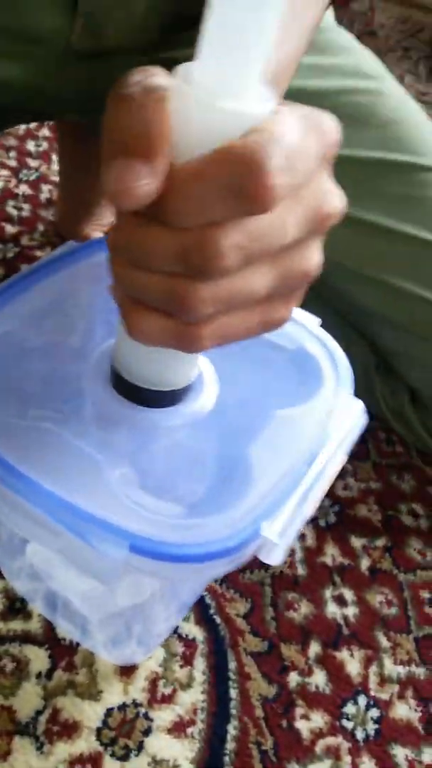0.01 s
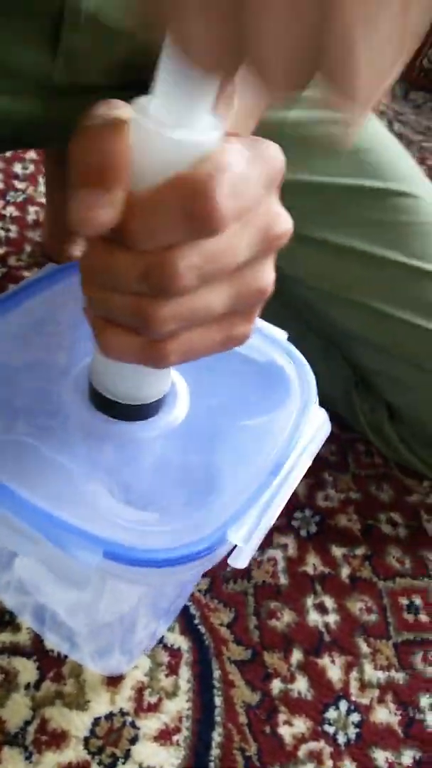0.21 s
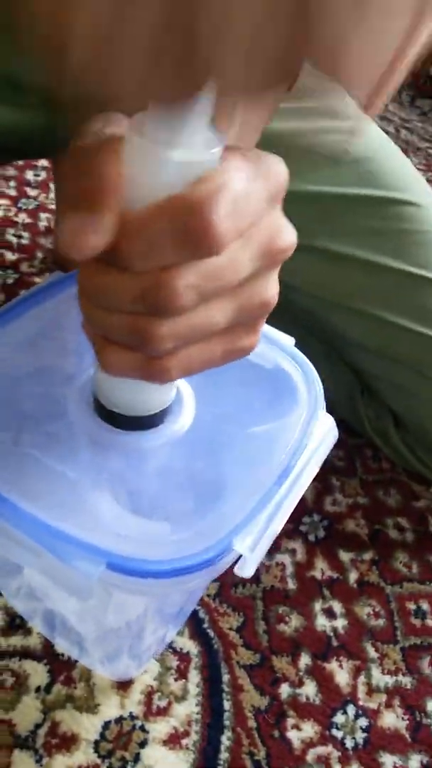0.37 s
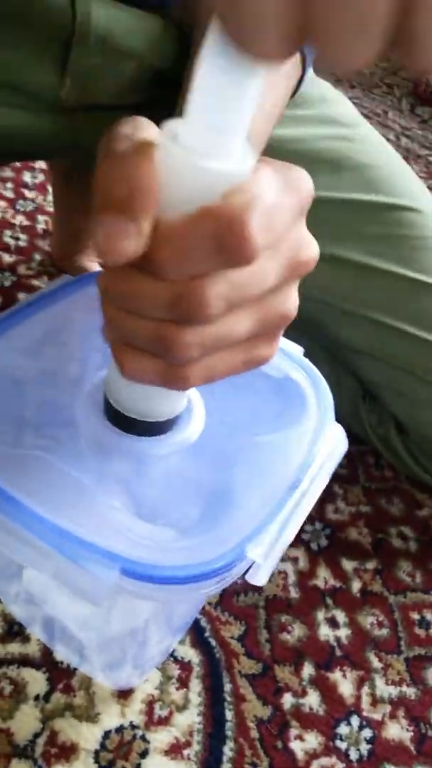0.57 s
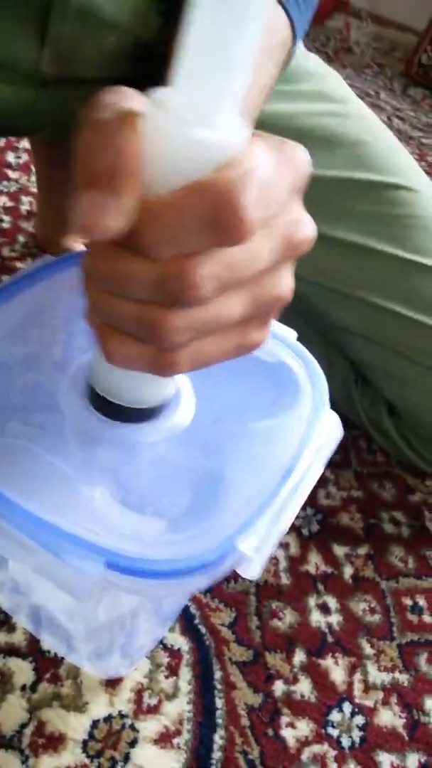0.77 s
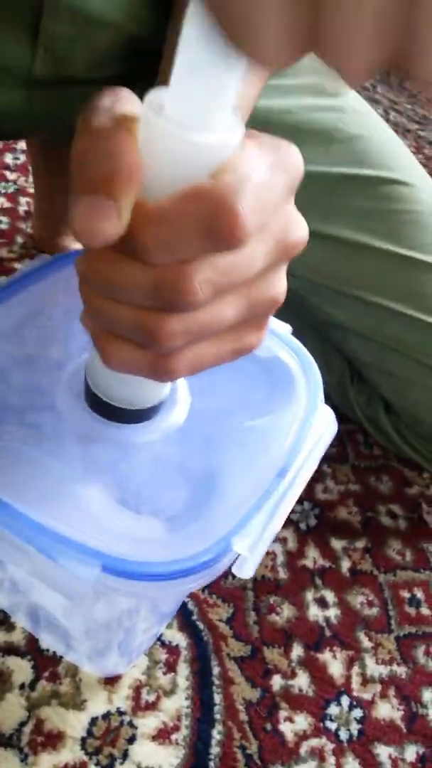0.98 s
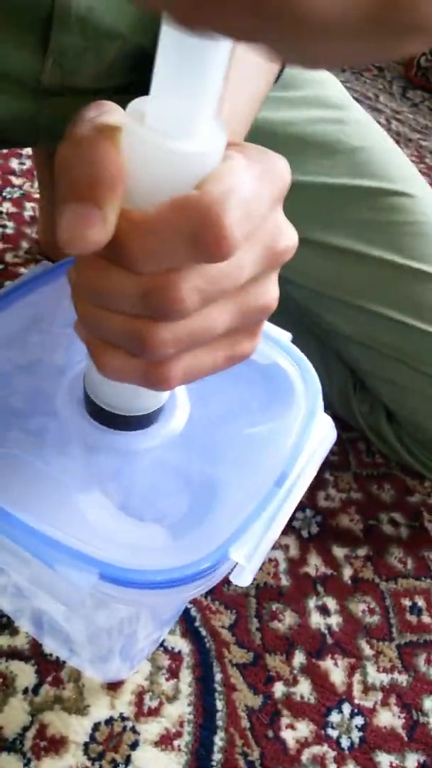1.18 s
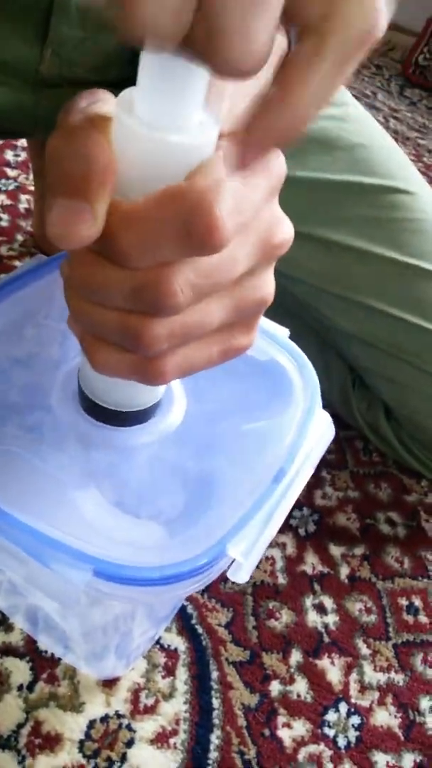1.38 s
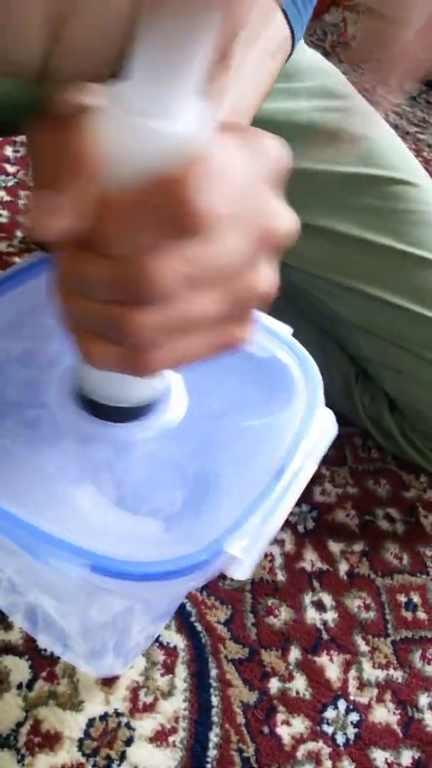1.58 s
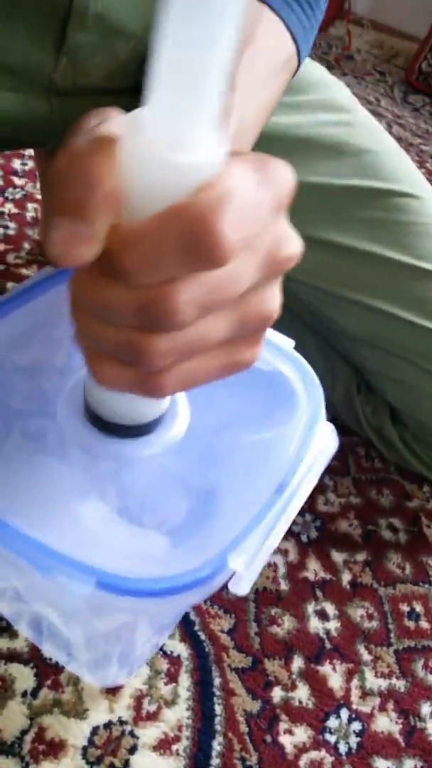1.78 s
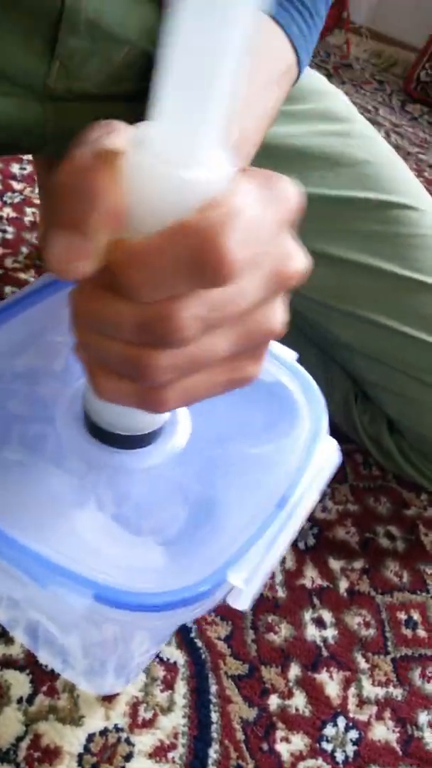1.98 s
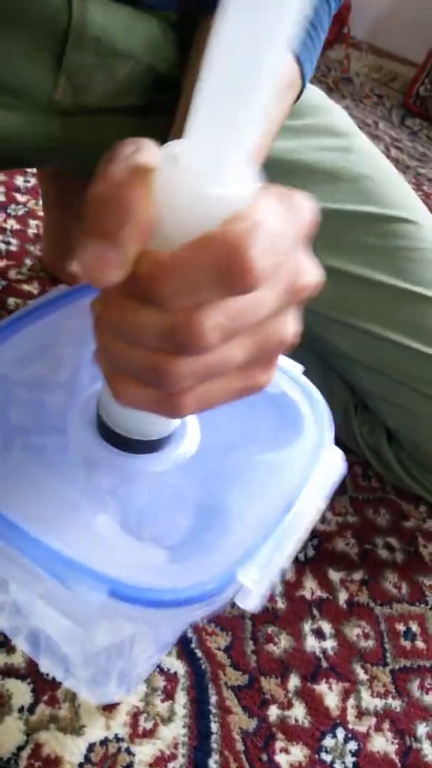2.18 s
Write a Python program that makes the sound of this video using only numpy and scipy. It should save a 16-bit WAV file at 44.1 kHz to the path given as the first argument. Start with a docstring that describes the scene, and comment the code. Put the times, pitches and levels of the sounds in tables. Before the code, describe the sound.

Close up in a small dry room, a plastic piston pump puffs and rubs in fast strokes on a hollow lid, with two loud clacks, small knocks, a short near-silent pause, then three more pushes.

```python
"""A hand vacuum pump is worked quickly on the lid of a plastic food container, in a small room.
It opens on the end of a pull, then four pushes hiss out with a softer, often whistling pull after each.
The first push slams into its end stop; after a short rest with only small knocks the pump starts again,
slams once more and runs through three pushes to a last pull. The air is noise through sliding barrel
resonances; the seal's rub is uneven noise, and the knocks on the hollow lid are damped modes."""
import sys
import numpy as np
from scipy import signal
from scipy.fft import rfft, irfft, next_fast_len
from scipy.io import wavfile
from scipy.ndimage import uniform_filter1d, map_coordinates

SR = 44100
rng = np.random.default_rng(int(sys.argv[2]) if len(sys.argv) > 2 else 0)


def dump(signal):
    """Clip the signal to [-1, 1] and save it as 16-bit WAV at the path in sys.argv[1]."""
    limited = np.clip(np.atleast_2d(signal).T, -1, 1)
    pcm = np.round(limited * 32767).astype(np.int16)
    wavfile.write(sys.argv[1], SR, pcm)


N = 97020  # 2.2 s


def amp(db):
    """Decibels to a linear gain."""
    return 10 ** (np.asarray(db) / 20)


def unit(x):
    """x brought to an rms of 1."""
    return x / np.sqrt(np.mean(x ** 2) + 1e-20)


def along(points, hz):
    """Read (Hz, value) points on a log frequency axis."""
    f, v = np.transpose(points)
    return np.interp(np.log(hz + 1), np.log(f + 1), v)


def clock():
    """The time of every sample in seconds."""
    return np.arange(N) / SR


def wobble(rate):
    """A smooth random curve, rate knots a second."""
    return map_coordinates(rng.standard_normal(N // 20), [clock() * rate], mode="mirror")


def filtered(x, response):
    """x shaped by a gain that is a function of frequency."""
    m = next_fast_len(N + SR // 2)
    return irfft(rfft(x, m) * response(np.fft.rfftfreq(m, 1 / SR)), m)[:N]


def noise(colour):
    """Coloured noise of rms 1."""
    return unit(filtered(rng.standard_normal(N), lambda hz: amp(along(colour, hz))))


def bump(middle, length):
    """A smooth swell, length seconds wide at half height."""
    return np.cos(np.pi / 2 * np.clip((clock() - middle) / length, -1, 1)) ** 2


def reedy(hz, width_hz):
    """A sine of rms 1 whose pitch shakes quickly, so that it sounds breathy."""
    shaking_hz = hz + width_hz * wobble(4 * width_hz)
    return np.sqrt(2) * np.sin(2 * np.pi * np.cumsum(shaking_hz) / SR)


# Resonances of the air in the barrel. Each row: ratio to the lowest resonance, lift in dB, width in Hz.
BARREL_MODES = [(1, 9.5, 170), (1.66, 9, 230), (2.25, 5, 260)]
BARREL_LOW_HZ, BARREL_PUSH_HZ = 2330, 3700  # lowest resonance: piston down; start of a push
PATCHY_DB = 2


def through_barrel(air, pitch_hz):
    """Air noise lifted at the barrel's sliding resonances, in turbulent patches."""
    hz, t, spectrum = signal.stft(air, SR, nperseg=512)
    pitch = np.interp(t, clock(), pitch_hz)
    lift_db = 0
    for ratio, db, width_hz in BARREL_MODES:
        offset = (hz[:, None] - ratio * pitch) / width_hz
        lift_db = lift_db + db / (1 + offset ** 2)
    # random gains smoothed over neighbouring frequencies, then over time
    patches = uniform_filter1d(rng.standard_normal(spectrum.shape), size=3, axis=0)
    patches = unit(uniform_filter1d(patches, size=5, axis=1))
    lifted = spectrum * amp(lift_db + PATCHY_DB * patches)
    return unit(signal.istft(lifted, SR, nperseg=512)[1][:N])


# Spectrum of the rubbing, with the lid's two resonances. Each row: frequency in Hz, level in dB per Hz.
RUB_SPECTRUM = [(40, -41.5), (120, -23.5), (200, -5), (300, -11), (380, -9), (460, 6), (580, -21.5),
                (700, -11), (900, -9.5), (1050, 0), (1220, -9), (1450, -28.5), (3000, -30.5), (8000, -43.5)]


def friction():
    """Uneven rubbing noise of rms 1 in the lid's two resonances."""
    return unit(noise(RUB_SPECTRUM) * amp(3.4 * wobble(130)))


# Push strokes. Each row: start, fastest moment and end in seconds, level in dB, treble lift in dB.
PUSH_STROKES = [(0.132, 0.203, 0.26, -28.5, -1), (0.392, .478, .512, -34.5, 2),
                (0.638, .716, .76, -34.5, 1.5), (0.859, .938, .995, -37.5, 1.5),
                (1.58, 1.669, 1.72, -27, 1), (1.807, 1.895, 1.975, -29, 1.5), (1.998, 2.1, 2.185, -32, 1.5)]
# Spectrum of the air pushed out. Each row: frequency in Hz, level in dB per Hz.
PUSH_AIR_SPECTRUM = [(200, -16.5), (1200, -2), (1900, -4.5), (2500, 0.5), (3500, -1), (4900, -4.5),
                     (5400, 5), (5900, -4), (6700, 2), (7600, -5.5), (10500, -4), (14500, -11.5)]
SWELL_DEPTH_DB, SWELL_SHAPE = 36, 1.4  # climb from stroke start to peak; curve of the rounded peak
TREBLE_HZ = 6600
PUSH_FLUTTER_DB = 1.1
PUSH_RUB_DB = -8.5  # piston friction against the air


def pushes():
    """Hiss and friction swell with the piston's speed while the resonances fall."""
    t = clock()
    flow, treble_flow, pitch = np.zeros(N), np.zeros(N), np.zeros(N)
    for start, fastest, end, db, treble_db in PUSH_STROKES:
        # 0 at the fastest moment, 1 at the start and at the end
        off_peak = np.maximum((fastest - t) / (fastest - start), (t - fastest) / (end - fastest))
        swell = amp(db - SWELL_DEPTH_DB * off_peak ** SWELL_SHAPE)
        flow = flow + swell
        treble_flow = treble_flow + swell * amp(treble_db)
        travel_left = np.interp(t, [start, end], [1, 0])
        stroke_pitch = BARREL_LOW_HZ + (BARREL_PUSH_HZ - BARREL_LOW_HZ) * travel_left ** 2
        pitch = np.where(t >= start, stroke_pitch, pitch)
    air = through_barrel(noise(PUSH_AIR_SPECTRUM), pitch)
    treble = filtered(air, lambda hz: hz ** 6 / (hz ** 6 + TREBLE_HZ ** 6))
    hiss = flow * (air - treble) + treble_flow * treble
    return hiss * amp(PUSH_FLUTTER_DB * wobble(220)) + amp(PUSH_RUB_DB) * flow * friction()


# Pull strokes. Each row: start and end in seconds, first and last level in dB,
# lowest barrel resonance at the end in Hz, whistle level in dB.
PULL_STROKES = [(-.02, 0.136, -41, -51.5, 4470, -51), (0.247, 0.397, -38.5, -51.5, 4250, -46.5),
                (0.51, 0.643, -41, -49.5, 3880, -51), (0.755, 0.88, -35, -59, 4070, -48.5),
                (0.982, 1.09, -41, -62.5, 3200, -84.5), (1.408, 1.473, -54, -63.5, 2930, -65),
                (1.479, 1.59, -40.5, -49, 3995, -86), (1.71, 1.81, -40, -44.5, 3200, -49),
                (1.941, 2.017, -43.5, -37, 3160, -48), (2.138, 2.222, -45.5, -38, 3060, -43.5)]
# Spectrum of the air drawn by a pull. Each row: frequency in Hz, level in dB per Hz.
PULL_AIR_SPECTRUM = [(200, -19.5), (1400, -4), (2000, 0.5), (2800, -0.5), (4200, 0.5), (4850, -4),
                     (5400, 1.5), (5950, -3), (6600, -0.5), (7800, -6), (11000, -6.5), (14500, -11)]
PULL_ATTACK_S, PULL_RELEASE_S = 0.032, 0.014
WHISTLE_S, WHISTLE_LEAD_S = 0.04, 0.026  # width; middle ahead of the stroke's end
WHISTLE_RATIO, WHISTLE_RISE_HZ_PER_S, WHISTLE_WIDTH_HZ = 1, 5000, 150
PULL_RUB_DB = -3  # piston friction against the air


def pulls():
    """A softer hiss with rising resonances that ends in a thin whistle, faint on some strokes."""
    t = clock()
    flow, pitch, whistle = np.zeros(N), np.zeros(N), np.zeros(N)
    for start, end, first_db, last_db, top_hz, whistle_db in PULL_STROKES:
        fade_in = np.clip((t - start) / PULL_ATTACK_S, 0, 1)
        fade_out = np.clip((end - t) / PULL_RELEASE_S, 0, 1)
        flow = flow + fade_in * fade_out * amp(np.interp(t, [start, end], [first_db, last_db]))
        stroke_pitch = np.interp(t, [start, end], [BARREL_LOW_HZ, top_hz])
        pitch = np.where(t >= start, stroke_pitch, pitch)
        middle = end - WHISTLE_LEAD_S
        glide_hz = WHISTLE_RATIO * top_hz + WHISTLE_RISE_HZ_PER_S * (t - middle)
        tone = reedy(glide_hz, WHISTLE_WIDTH_HZ)
        whistle = whistle + amp(whistle_db) * bump(middle, WHISTLE_S) * tone
    air = flow * through_barrel(noise(PULL_AIR_SPECTRUM), pitch) + whistle
    flutter = amp(0.4 * wobble(120))
    return air * flutter + amp(PULL_RUB_DB) * flow * friction()


# Puffs as the plunger turns at the top. Each row: middle in seconds, level in dB.
VALVE_SPITS = [(.128, -49.5), (.868, -43.5), (1.596, -37), (1.832, -38), (2.044, -36)]
# Spectrum of the puffs. Each row: frequency in Hz, level in dB per Hz.
SPIT_SPECTRUM = [(300, -21), (1500, -1), (2800, -7.5), (4800, -2.5), (6000, 1.5), (6800, 6.5), (7600, -3),
                 (11500, -4.5), (14500, -4.5)]
SPIT_S = 0.0084


def spits():
    """The valve lets out very short, bright puffs of noise."""
    puffs = sum(amp(db) * bump(s, SPIT_S) for s, db in VALVE_SPITS)
    return noise(SPIT_SPECTRUM) * puffs


def ring(modes, t, ratio):
    """Damped modes that build up briefly after a blow, each a little louder or softer every time."""
    total = 0
    for hz, db, t60, attack in modes:
        decay = amp(db + rng.normal(0, 1.0) - 60 * t / t60)
        build_up = (1 - np.exp(-t / attack)) ** 2
        total = total + decay * build_up * np.sin(2 * np.pi * hz * ratio * t)
    return total


# Contacts of the plunger. Each row: time in seconds, level in dB, then the thump, upper lid ring
# and click in dB against that level, and a pitch ratio for the modes.
CONTACTS = [(0.127, -44.5, 29, -22, 4, 2.3), (.135, -25.5, 10, -10, -17, 0.97),
            (.2167, 4, -1.5, 2, -5, 1.004), (0.39, -27.5, 18, -15.5, -16, 0.78),
            (0.49, -22, -1, -13, -9, 1.06), (0.512, -25.5, 8, -5, -3.5, 0.86),
            (0.5193, -20.5, -10, -12, -22, 1.09), (0.635, -35.5, -14, -6, -2, 1),
            (.642, -26, 9, -7, -27, 0.98), (0.751, -30, 9, -19, -16, 0.78),
            (0.864, -31.5, 22.5, -19, 1, 0.93), (.976, -25.5, 12, -19, -12, 0.97),
            (1.116, -26.5, 12, -18.5, -11, 0.88), (1.24, -34, -10, -18, -16, 1), (1.252, -37, 6, -9, -7, 1),
            (1.317, -32, 13, -19, -18, 1), (1.37, -37, 18, -9, -5, 0.92),
            (1.468, -37, 26.5, -4.5, -3, 0.88), (1.472, -27, 9.5, -7.5, 2.5, 0.88),
            (1.596, -23, 7, -14, -7, 0.95), (1.6815, 4, 0.5, 0.5, -4, 0.98),
            (1.7967, -7, 2.5, -5.5, -15, 0.97), (1.829, -29, 23, 0, -9, 0.75),
            (1.919, -16, 5.5, -30, -26, 1.07), (1.9345, -24.5, -16, -29, 9, 0.76),
            (1.968, -39, -3, -20, -4, 0.86), (2.043, -23, -10, -4.5, -6, 1),
            (2.1382, -22.5, 1, -4, 7, 0.86)]
# Modes of the box, the lid (low and high) and the barrel, in that order.
# Each row: frequency in Hz, level in dB, 60 dB decay in seconds, attack in seconds.
THUMP_MODES = [(185.5, -23.5, .055, 0.0011), (276, -14, 0.024, 0.0031)]
LOW_LID_MODES = [(435.8, 2, 0.032, 0.0026), (481, -7, 0.047, 0.0033)]
HIGH_LID_MODES = [(928, -17.5, 0.057, 0.00037), (1042, -0.5, .027, 0.00047), (1101, -23.5, 0.054, 0.0018)]
CLICK_MODES = [(2660, -28, 0.0059, 0.00036), (3120, -17, 0.0053, .0003), (3980, -15.5, 0.014, .0003),
               (5120, -38, .012, 0.00023)]
# Spectrum of the noise in each click. Each row: frequency in Hz, level in dB.
CRACK_SPECTRUM = [(200, -1), (1000, -22), (1500, -9.5), (2100, -6), (3200, 3), (4400, 0), (6500, -9.5),
                  (9000, -33.5), (14000, -28)]
CRACK_DB, CRACK_T60_S = -15, 0.016


def knocks():
    """Each contact thumps the box, rings the lid and clicks in the barrel."""
    out = np.zeros(N + SR)
    t = np.arange(SR // 5) / SR
    grit = noise(CRACK_SPECTRUM)
    for s, db, thump_db, ring_db, click_db, ratio in CONTACTS:
        fresh_grit = np.roll(grit, rng.integers(N))[:len(t)]
        crack = amp(CRACK_DB - 60 * t / CRACK_T60_S) * fresh_grit
        thump = amp(thump_db) * ring(THUMP_MODES, t, ratio)
        lid = ring(LOW_LID_MODES, t, ratio) + amp(ring_db) * ring(HIGH_LID_MODES, t, ratio)
        click = amp(click_db) * (ring(CLICK_MODES, t, ratio) + crack)
        out[round(s * SR):][:len(t)] += amp(db) * (thump + lid + click)
    return out[:N]


# Loudness of the hands on the pump. Each row: time in seconds, level in dB.
RUB_LEVELS = [(0, -42.5), (.1, -54), (.17, -49), (.21, -39), (.33, -45), (.41, -51.5), (.55, -48),
              (.64, -50.5), (.72, -46), (.87, -49), (.95, -45.5), (1.09, -59), (1.28, -72), (1.43, -50.5),
              (1.53, -46), (1.58, -51.5), (1.76, -36), (1.9, -39), (2.03, -44.5), (2.2, -41)]
# Short judders of the seal. Each row: middle in seconds, length in seconds, level in dB.
SEAL_JUDDERS = [(0.56, 0.01, -39.5), (1.437, 0.012, -58), (1.541, 0.0067, -39.5), (1.771, 0.021, -34.5),
                (1.998, 0.012, -33), (2.096, 0.024, -35.5), (2.191, 0.0069, -32.5)]
JUDDER_HZ, JUDDER_WIDTH_HZ = 1026, 53


def rubbing():
    """The hands rub on the pump as noise; now and then the seal judders on a shaky tone."""
    rub = amp(np.interp(clock(), *np.transpose(RUB_LEVELS))) * friction()
    judder = sum(amp(db) * bump(s, length) for s, length, db in SEAL_JUDDERS)
    return rub + judder * reedy(JUDDER_HZ, JUDDER_WIDTH_HZ)


# Soft bumps of the box on the carpet as the load reverses. Each row: middle in seconds, level in dB.
BOX_BUMPS = [(0.129, -40), (.392, -53), (0.518, -66), (0.638, -40.5), (0.871, -44.5), (1.476, -52),
             (1.598, -37), (1.831, -50), (2.041, -40), (2.141, -48)]
BUMP_S, BUMP_HZ = 0.009, 146


def bumps():
    """A couple of low cycles each time the box rocks."""
    out = np.zeros(N)
    for s, db in BOX_BUMPS:
        out += amp(db) * bump(s, BUMP_S) * np.sin(2 * np.pi * BUMP_HZ * (clock() - s))
    return out


# Reverberation of the room. Each row: frequency in Hz, 60 dB decay in seconds.
ROOM_DECAY = [(100, 0.083), (450, 0.25), (1000, 0.29), (3000, .25), (10000, .15)]
# Tone of the reverberation. Each row: frequency in Hz, gain in dB.
ROOM_TONE = [(100, 17), (430, -6), (700, 3), (900, -4), (1080, -10), (1500, 2.5), (4000, -8), (12000, 1.5)]
ROOM_DB, ROOM_DELAY_S = -10.5, 0.008


def room(x):
    """The short tail of a carpeted room: noise that dies away at its own pace in each band."""
    hz, t, spectrum = signal.stft(rng.standard_normal(SR // 2), SR, nperseg=256)
    decay = amp(-60 * t / along(ROOM_DECAY, hz)[:, None])
    tail = signal.istft(spectrum * decay, SR, nperseg=256)[1]
    tail = np.pad(tail / np.linalg.norm(tail), (round(ROOM_DELAY_S * SR), 0))
    echo = signal.fftconvolve(x, tail)[:N]
    return filtered(echo, lambda hz: amp(along(ROOM_TONE, hz)))


# Spectrum of the steady background noise. Each row: frequency in Hz, level in dB per Hz.
FLOOR_SPECTRUM = [(25, 1), (50, 6), (100, -0.5), (180, 0), (260, -1), (450, -9.5), (700, -15), (1050, -36),
                  (1300, -19), (1750, -13.5), (2300, -19), (6000, -23.5), (14000, -26)]
FLOOR_DB = -56


def scene():
    """The pump and its box, their room tail and a steady noise floor."""
    pump = pushes() + pulls() + spits() + rubbing() + knocks() + bumps()
    return (pump + amp(ROOM_DB) * room(pump) + amp(FLOOR_DB) * noise(FLOOR_SPECTRUM))[None]


MIC_LOW_HZ, TOP_HZ = 95, 14650  # bass roll-off; band limit


def record(dry):
    """The hardest knocks clip; then the deep bass rolls off and nothing is kept above the band limit."""
    clipped = np.clip(dry[0], -1, 1)
    return filtered(clipped, lambda hz: hz ** 2 / (hz ** 2 + MIC_LOW_HZ ** 2) * (hz < TOP_HZ))[None]


dry = scene()
out = record(dry)
dump(out)
```